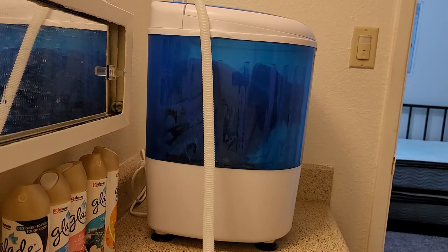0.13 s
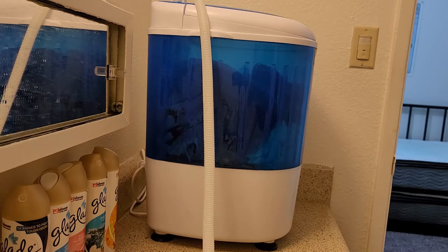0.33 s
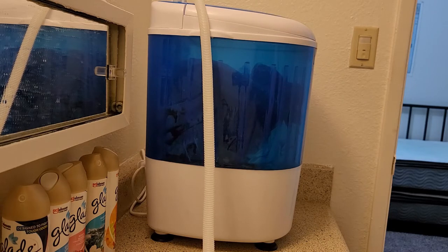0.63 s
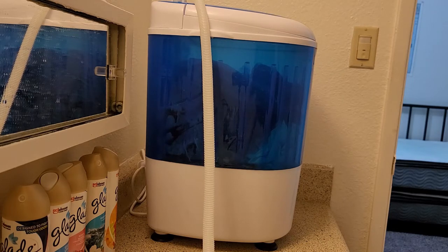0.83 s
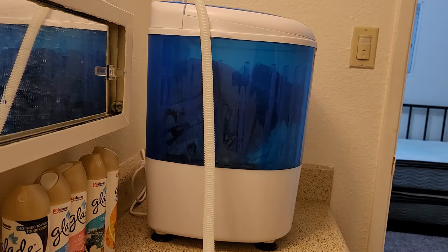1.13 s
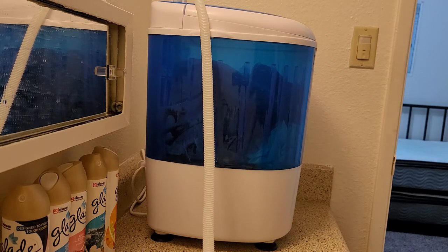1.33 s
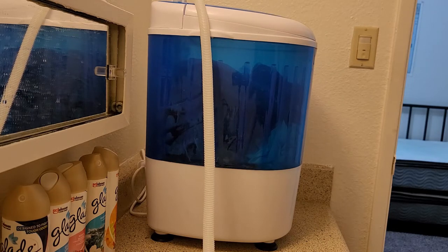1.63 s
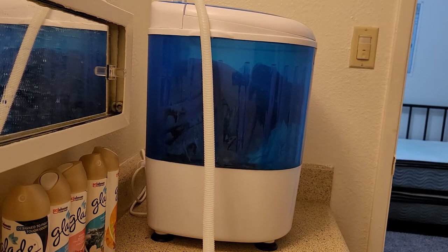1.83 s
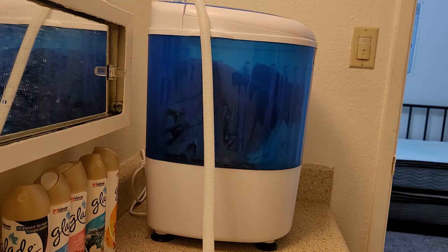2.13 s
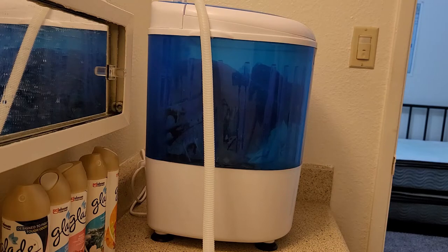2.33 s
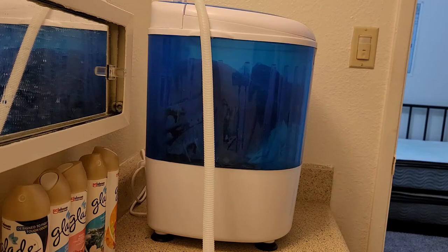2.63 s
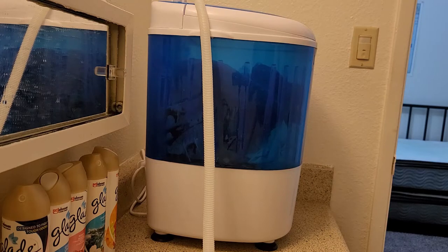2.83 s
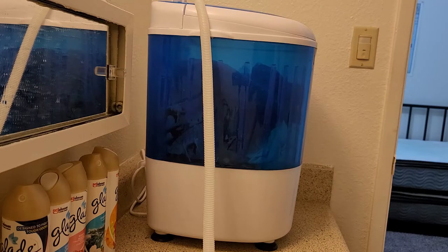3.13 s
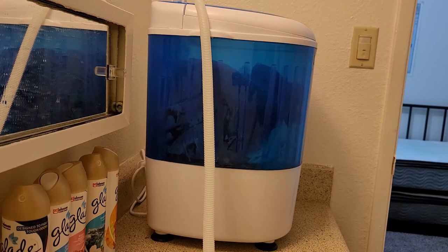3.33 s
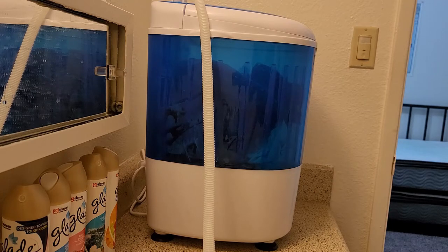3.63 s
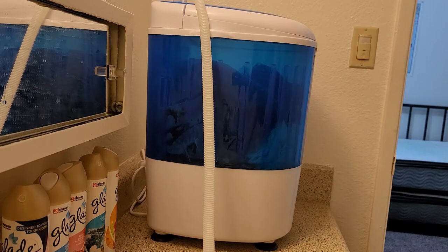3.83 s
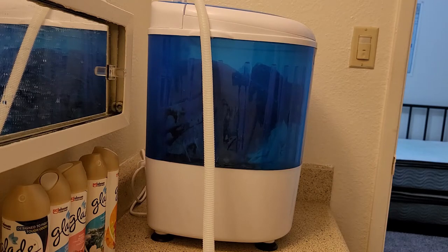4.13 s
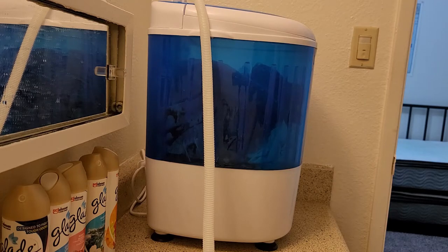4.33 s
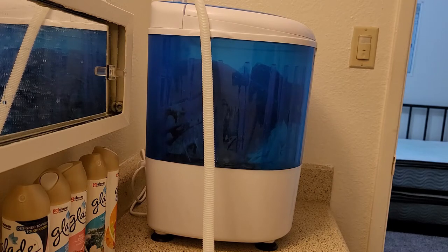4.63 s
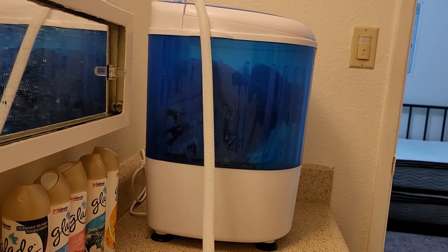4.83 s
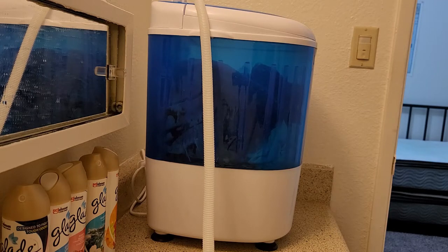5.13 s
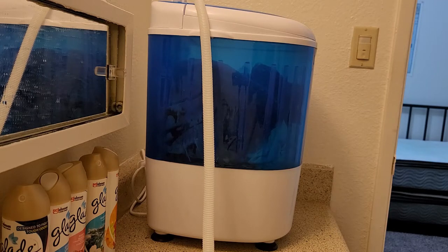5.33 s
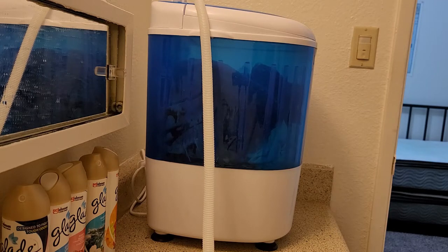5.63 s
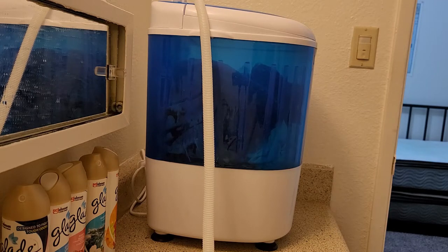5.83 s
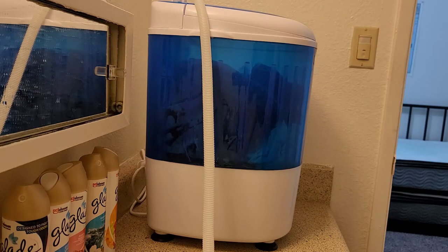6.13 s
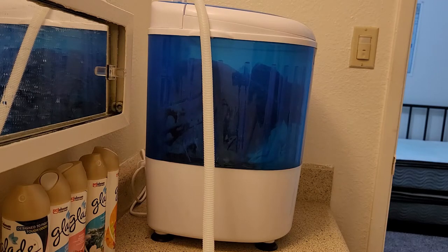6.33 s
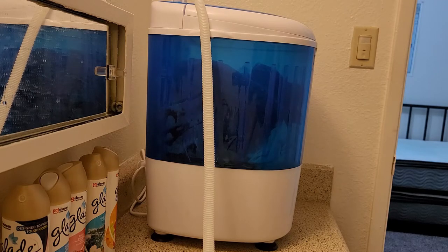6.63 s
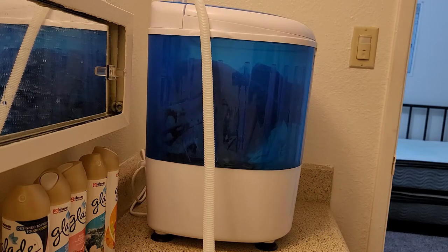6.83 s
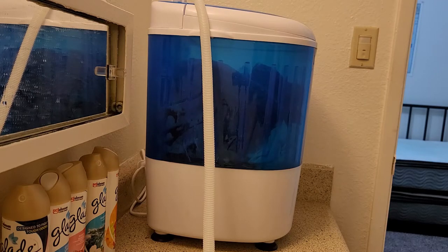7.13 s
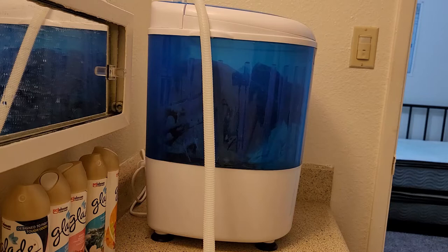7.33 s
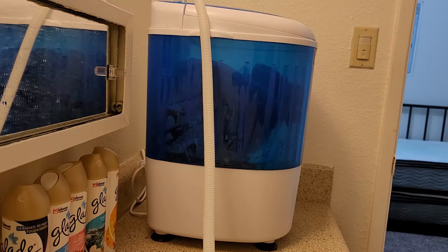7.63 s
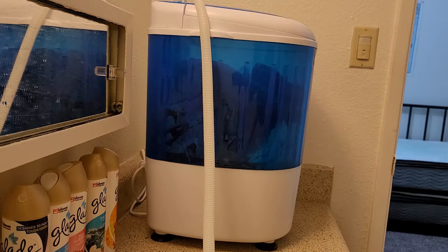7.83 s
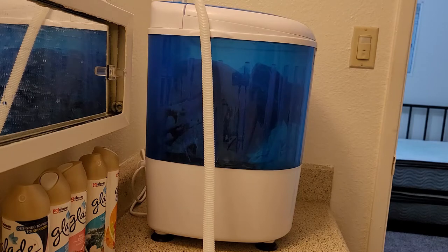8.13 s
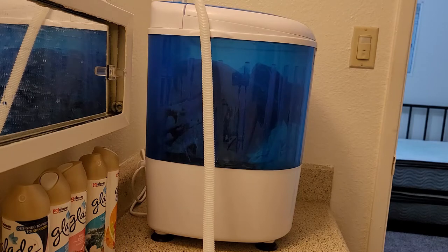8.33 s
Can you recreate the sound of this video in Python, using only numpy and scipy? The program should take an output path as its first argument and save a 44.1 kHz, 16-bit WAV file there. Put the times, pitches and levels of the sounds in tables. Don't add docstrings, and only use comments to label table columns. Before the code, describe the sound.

A tap runs steadily through a hose into a small plastic washer tub in a tiled bathroom. Broad, dense hiss and fine spray sit over hollow plastic drumming and low rumble, with a faint mains hum beneath. One soft, low thud comes a little after two seconds. The water continues evenly to the end, heard in stereo from handheld microphones about a metre away.

```python
import sys
import numpy as np
from scipy import signal
from scipy.fft import rfft, irfft, next_fast_len
from scipy.io import wavfile
from scipy.ndimage import uniform_filter1d

SR = 44100
rng = np.random.default_rng(int(sys.argv[2]) if len(sys.argv) > 2 else 0)


def elevation(decibels):
    levels = np.asarray(decibels, float)
    return 10 ** (levels / 20)


def unload_audio(sound):
    columns = np.transpose(np.atleast_2d(sound))
    steps = np.round(np.clip(columns, -1, 1) * 32767)
    wavfile.write(sys.argv[1], SR, steps.astype(np.int16))


N = 373527
SIZE = next_fast_len(N)
HZ = np.arange(SIZE // 2 + 1) * SR / SIZE
TIME_S = np.arange(N) / SR

# frequency in Hz, width in Hz, left level in dB per
# Hz, right level in dB per Hz, left port's phase lead in radians, likeness of the ports 0-1.
ROOM_MODES = [(35.0, 26, -79, -79, 0.3, 0.99), (70.0, 24, -65, -65, 0.2, 0.99),
              (102.0, 11, -77, -77, 0.0, 0.99), (124.0, 10, -67, -68, 0.1, 0.99),
              (140.0, 22, -64, -66, 0.1, 0.99), (153.0, 8, -65, -66, 0.1, 0.99),
              (172.0, 20, -71, -72, -0.1, 0.98), (205.0, 15, -66, -76, 0.0, 0.96),
              (316.0, 38, -79, -65, -2.0, 0.58), (341.0, 24, -75, -76, -3.0, 0.99),
               (363.0, 23, -82, -66, 1.6, 0.81), (389.0, 28, -78, -66, 0.6, 0.5),
               (444.0, 44, -78, -66, 1.4, 0.21), (481.0, 14, -99, -73, 0.9, 0.99),
               (524.0, 63, -73, -67, -2.8, 0.54), (571.0, 20, -71, -70, 2.6, 0.99),
               (608.0, 97, -71, -71, -1.1, 0.1),
              (672.0, 29, -76, -75, 3.0, 0.99), (720.0, 55, -74, -73, -0.8, 0.54),
                 (767.0, 46, -72, -75, 2.6, 0.43), (830.0, 68, -70, -73, 2.4, 0.67),
                 (895.0, 97, -79, -78, 3.0, 0.23), (990.0, 97, -71, -73, 2.7, 0.66),
                 (1028.0, 36, -73, -80, 0.3, 0.85), (1066.0, 50, -75, -79, 1.0, 0.64),
                 (1141.0, 26, -84, -82, -3.1, 0.99), (1166.0, 15, -98, -82, -2.8, 0.99),
                 (1260.0, 5, -89, -90, -3.1, 0.99)]
TUB_MODES = [(1411.0, 83, -69, -67, -3.1, 0.83), (1541.0, 109, -70, -70, 1.6, 0.59),
             (1597.0, 66, -76, -71, -0.6, 0.99), (1682.0, 122, -63, -65, -3.1, 0.75),
             (1790.0, 276, -69, -71, -3.0, 0.32), (1919.0, 57, -70, -71, -0.2, 0.99),
             (1985.0, 79, -75, -70, -2.0, 0.71), (2029.0, 60, -75, -84, -0.1, 0.99),
             (2120.0, 137, -73, -72, -2.7, 0.82), (2214.0, 85, -68, -70, -0.1, 0.5),
             (2264.0, 46, -68, -68, -0.2, 0.79), (2331.0, 61, -72, -71, 0.4, 0.99),
             (2425.0, 151, -73, -72, 1.8, 0.72), (2492.0, 55, -67, -72, 3.1, 0.97),
             (2635.0, 92, -75, -74, 0.7, 0.72), (2762.0, 128, -78, -74, -0.6, 0.27),
             (2930.0, 138, -76, -79, 0.5, 0.25), (3035.0, 76, -88, -80, -1.9, 0.89),
             (3115.0, 63, -78, -85, 3.0, 0.47), (3278.0, 151, -76, -78, -0.3, 0.37),
             (3436.0, 93, -82, -79, -0.7, 0.43), (3529.0, 90, -81, -78, 0.7, 0.66),
             (3596.0, 110, -80, -79, -0.1, 0.22), (3707.0, 128, -82, -79, -0.9, 0.51),
             (3849.0, 210, -87, -78, 1.3, 0.5), (3899.0, 72, -81, -94, 0.7, 0.99),
             (4066.0, 199, -79, -83, -0.5, 0.36), (4150.0, 102, -77, -78, 2.4, 0.75)]
TAP_MODES = [(4460.0, 198, -78, -77, -0.2, 0.69), (4710.0, 134, -77, -76, -2.6, 0.69),
             (4820.0, 179, -75, -79, 0.6, 0.44), (4940.0, 112, -85, -76, -0.5, 0.99),
             (5040.0, 165, -72, -78, 2.1, 0.63), (5190.0, 263, -72, -74, 0.7, 0.27),
             (5500.0, 153, -74, -74, 1.6, 0.68), (5780.0, 320, -70, -71, -0.3, 0.76),
             (5910.0, 76, -74, -77, 0.1, 0.75), (6140.0, 158, -77, -70, 0.4, 0.99),
             (6530.0, 207, -81, -72, -1.1, 0.27), (6710.0, 189, -76, -74, 0.7, 0.5),
             (6860.0, 218, -78, -75, 3.1, 0.37), (7030.0, 290, -80, -75, -0.2, 0.28),
             (7230.0, 345, -79, -75, -2.9, 0.56), (7390.0, 349, -75, -83, -0.2, 0.94),
             (7630.0, 449, -77, -81, 3.1, 0.4), (7870.0, 205, -78, -88, 2.4, 0.34)]
SPRAY_MODES = [(8350.0, 282, -82, -86, -3.0, 0.44), (8870.0, 651, -78, -79, 0.6, 0.17),
               (9340.0, 205, -82, -84, -1.1, 0.36), (9630.0, 369, -81, -81, 1.1, 0.36),
               (9830.0, 141, -82, -82, -1.1, 0.84), (10050.0, 124, -82, -86, -2.0, 0.77),
               (10430.0, 775, -80, -79, 2.1, 0.22), (10870.0, 576, -81, -82, 2.0, 0.19),
               (11220.0, 387, -86, -81, -0.2, 0.39), (11520.0, 775, -79, -98, -2.1, 0.99),
               (12300.0, 602, -75, -80, -2.7, 0.21), (12650.0, 397, -90, -78, -1.0, 0.99),
               (12900.0, 551, -76, -81, -1.6, 0.23), (13460.0, 401, -78, -82, 2.3, 0.31),
               (13830.0, 380, -81, -82, -2.6, 0.36), (14170.0, 421, -81, -86, -0.4, 0.41),
               (14700.0, 414, -80, -85, -0.7, 0.32), (15130.0, 572, -78, -84, -1.1, 0.23),
               (15480.0, 84, -85, -84, -0.8, 0.99)]

# frequency in Hz, left level in dB per Hz,
# right level in dB per Hz, correlation of the ports -1..1.
ROOM_SCATTER = [(20, -91, -82, -0.8), (36, -88, -80, -0.8), (66, -83, -80, -0.3), (120, -82, -83, -0.7),
                (217, -81, -82, -0.4), (394, -77, -85, 0.7), (716, -92, -93, -0.4), (1300, -77, -77, -0.2)]
TUB_SCATTER = [(1300, -77, -76, -0.2), (1880, -84, -87, 0.8), (2460, -75, -73, -0.5),
               (3040, -81, -83, -0.0), (3620, -81, -93, -0.8), (4200, -82, -79, 0.2)]
TAP_SCATTER = [(4200, -78, -76, -0.0), (5200, -83, -78, -0.2), (6200, -73, -74, 0.0),
               (7200, -89, -94, -0.8), (8200, -79, -92, 0.2)]
SPRAY_SCATTER = [(8200, -80, -108, 0.3), (9450, -86, -81, -0.6), (10700, -98, -85, 0.8),
                 (11950, -94, -79, 0.2), (13200, -101, -84, 0.8), (14450, -95, -84, -0.5),
                 (15700, -78, -82, 0.3)]
BAND_EDGES_HZ = (18, 1300, 4200, 8200, 15860)

# time in seconds, flow in dB.
FLOW = [
    (0, -39),
    (1.5, -39),
    (2.8, -38.8),
    (5.5, -38.5),
    (7, -39),
    (8.47, -39.3),
]
# start in seconds, level in dB, frequency in Hz, t60 in seconds, push in seconds.
THUD = [
    (2.239, -24, 67, 0.14, 0.021),
    (2.248, -28, 332, 0.045, .003),
]
# time in seconds, place between two spots 0-1.
SWAY = [
    (0, 0.16),
    (1.8, 0.46),
    (2.6, 0.98),
    (4.5, 0.85),
    (6.4, 0.92),
    (8.47, 0.63),
]
# frequency in Hz, change in dB.
COLOUR_SHIFT = [(1200, -2), (1700, 1.5), (2250, 1), (3100, 0), (4400, -0.7), (5800, 3), (7000, -1.1),
                (12000, 2.1)]


def hum():
    hum_hz, hum_rms_db = 120, -60.5
    return elevation(hum_rms_db) * np.sqrt(2) * np.sin(2 * np.pi * hum_hz * TIME_S)


def thud():
    out = np.zeros(N)
    for start_s, db, hz, t60_s, push_s in THUD:
        t = np.maximum(TIME_S - start_s, 0)
        envelope = (1 - np.exp(-t / push_s)) * 1000 ** (-t / t60_s)
        out += elevation(db) * envelope * np.sin(2 * np.pi * hz * t)
    return out * elevation(np.array([[-1.2], [1.2]]))


def random_walk(rate_hz):
    hold = int(SR / rate_hz)
    steps = np.repeat(rng.standard_normal(1000), hold)[:N]
    walk = uniform_filter1d(uniform_filter1d(steps, hold), hold)
    return walk / walk.std()


def tile_echoes(t60_s, count):
    t = np.arange(SR // 2) / SR
    decay = 1000 ** (-t / t60_s)
    unit_energy = np.sqrt(2 * np.log(1000) / t60_s / SR)
    return rfft(rng.standard_normal((count, 2, len(t))) * decay * unit_energy, SIZE)


def stream_strikes(drift_db, count):
    noise = rng.standard_normal((count, N))
    noise[:4] *= elevation(drift_db * np.array([random_walk(1.596) for _ in range(4)]))
    return rfft(noise, SIZE) * np.sqrt(SR / 2)


def resonances(modes, strikes, echoes, echo_share):
    out = np.zeros((2, len(HZ)), complex)
    for k, (hz, width_hz, left_db, right_db, lead_rad, alike) in enumerate(modes):
        near = slice(*np.searchsorted(HZ, [hz - 6 * width_hz, hz + 6 * width_hz]))
        shape = 1 / (1 + (2 * (HZ[near] - hz) / width_hz) ** 2)
        path = np.sqrt(alike) + np.sqrt(echo_share * (1 - alike)) * echoes[k % 4][:, near]
        kept = alike + echo_share * (1 - alike)
        combed_power = np.sum(np.abs(shape * path) ** 2, axis=1, keepdims=True)
        path *= np.sqrt(kept * np.sum(shape ** 2) / combed_power)
        stray = np.sqrt((1 - echo_share) * (1 - alike)) * strikes[[4 + k % 2, 6 + k % 2], near]
        ports = np.array([[elevation(left_db) * np.exp(1j * lead_rad)], [elevation(right_db)]])
        out[:, near] += ports * shape * (path * strikes[k % 4, near] + stray)
    return out


def scattered(scatter, inside, strikes, echo, echo_share):
    hz, *columns = np.transpose(scatter)
    left_db, right_db, alike = (np.interp(np.log(HZ[inside]), np.log(hz), c) for c in columns)
    unrelated = np.sqrt(1 - echo_share) * strikes[9:11, inside]
    echoed = np.sqrt(echo_share) * echo[:, inside] * strikes[11, inside]
    signs = np.array([np.ones_like(alike), np.sign(alike)])
    common = np.sqrt(np.abs(alike)) * strikes[8, inside] * signs
    field = common + np.sqrt(1 - np.abs(alike)) * (unrelated + echoed)
    return elevation(np.array([left_db, right_db])) * field


def driven_body(modes, scatter, strikes, echoes, band, echo_share, db):
    out = resonances(modes, strikes, echoes, echo_share)
    inside = slice(*np.searchsorted(HZ, BAND_EDGES_HZ[band:band + 2]))
    out[:, inside] += scattered(scatter, inside, strikes, echoes[band], echo_share)
    return elevation(db) * out * (HZ < BAND_EDGES_HZ[-1])


def at_moving_ports(spectrum, echoes, wall_share):
    shift_hz, shift_db = np.transpose(COLOUR_SHIFT)
    colour_db = np.interp(np.log(HZ + 1), np.log(shift_hz), shift_db)
    place = np.interp(TIME_S, *np.transpose(SWAY))
    out = 0
    for echo, side, weight in ((echoes[0, 0], -0.5, 1 - place), (echoes[2, 1], 0.5, place)):
        wall = np.sqrt(1 - wall_share) + np.sqrt(wall_share) * echo
        wall /= np.sqrt(uniform_filter1d(np.abs(wall) ** 2, size=1500))
        out = out + weight * irfft(spectrum * wall * elevation(side * colour_db), SIZE)[:, :N]
    return out


def rumble_and_trickle(strikes, echoes):
    modes = ROOM_MODES
    air = driven_body(modes, ROOM_SCATTER, strikes, echoes, band=0, echo_share=0.22, db=-0.86)
    low = 1 / (1 + (HZ / 240) ** 8)
    rumble = irfft(air * low, SIZE)[:, :N] * elevation(0.5 * random_walk(1.61))
    trickle = irfft(air * (1 - low), SIZE)[:, :N] * elevation(0.14 * random_walk(6))
    return rumble + trickle


def tub_drumming(strikes, echoes, flow_db, sputter):
    modes = TUB_MODES
    drum = driven_body(modes, TUB_SCATTER, strikes, echoes, band=1, echo_share=0.45, db=-0.5)
    level_db = 0.3 * flow_db + 0.1 * sputter + 0.59 * random_walk(14)
    return at_moving_ports(drum, echoes, wall_share=0.079) * elevation(level_db)


def tap_jet(strikes, echoes, flow_db, sputter):
    jet = driven_body(TAP_MODES, TAP_SCATTER, strikes, echoes, band=2, echo_share=0.41, db=-0.93)
    level_db = 0.6 * flow_db + 0.28 * sputter + 0.29 * random_walk(14)
    return at_moving_ports(jet, echoes, wall_share=0.17) * elevation(level_db)


def fine_spray(strikes, echoes, flow_db, sputter):
    spray = driven_body(SPRAY_MODES, SPRAY_SCATTER, strikes, echoes, band=3, echo_share=0.7, db=-1.1)
    level_db = 0.6 * flow_db + 0.5 * sputter + 0.14 * random_walk(16)
    return at_moving_ports(spray, echoes, wall_share=0.17) * elevation(level_db)


def water():
    s, db = np.transpose(FLOW)
    flow_db = np.interp(TIME_S, s, db - np.mean(db))
    sputter = random_walk(12) + 0.35 * random_walk(45)
    strikes = stream_strikes(drift_db=1.44, count=12)
    echoes = tile_echoes(t60_s=0.14, count=4)
    out = rumble_and_trickle(strikes, echoes)
    out = out + tub_drumming(strikes, echoes, flow_db, sputter)
    out = out + tap_jet(strikes, echoes, flow_db, sputter)
    return out + fine_spray(strikes, echoes, flow_db, sputter)


def scene():
    return hum() + thud() + water()


def low_pass(x):
    return signal.sosfilt(signal.butter(12, 16660, fs=SR, output="sos"), x)


def record(dry):
    bass_cut = signal.butter(1, 15, "high", fs=SR, output="sos")
    port_gain_db = np.array([[0.18], [-0.18]])
    mix = signal.sosfilt(bass_cut, dry) * elevation(port_gain_db)
    return low_pass(mix)


dry = scene()
out = record(dry)
unload_audio(out)
```